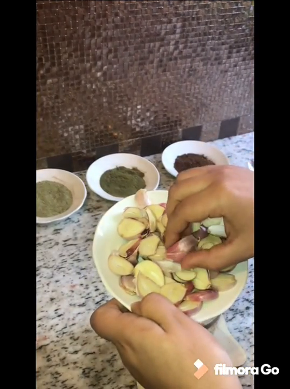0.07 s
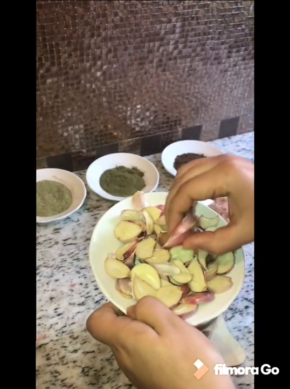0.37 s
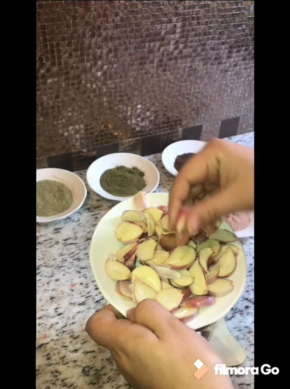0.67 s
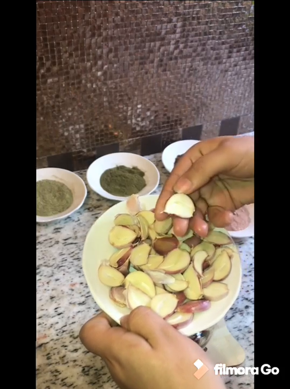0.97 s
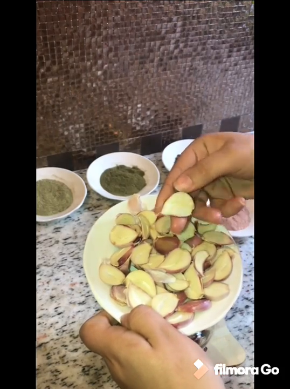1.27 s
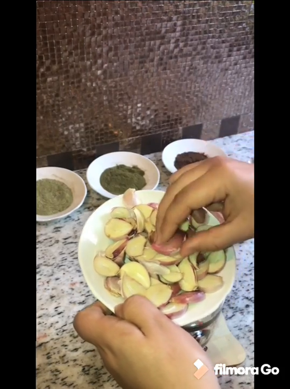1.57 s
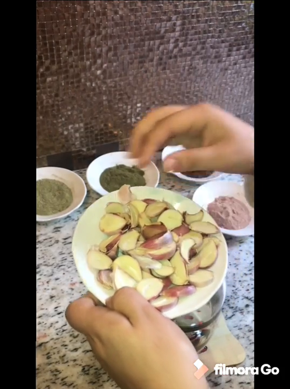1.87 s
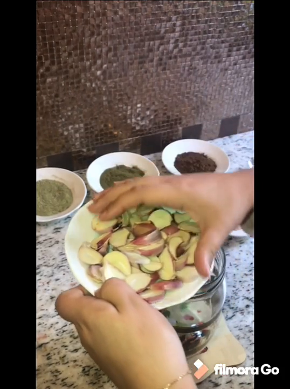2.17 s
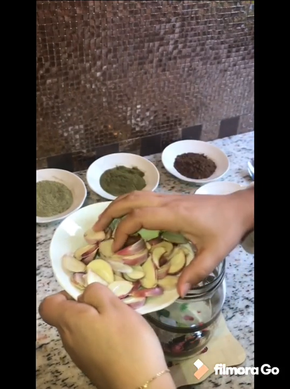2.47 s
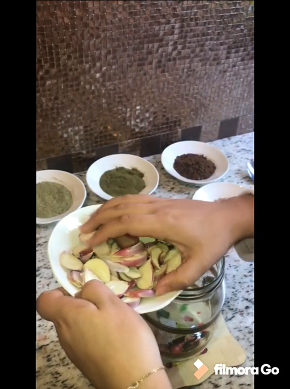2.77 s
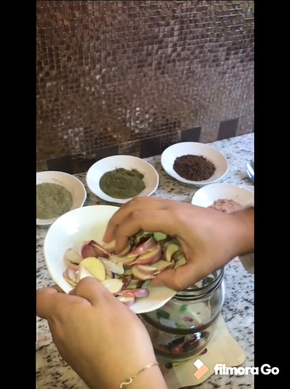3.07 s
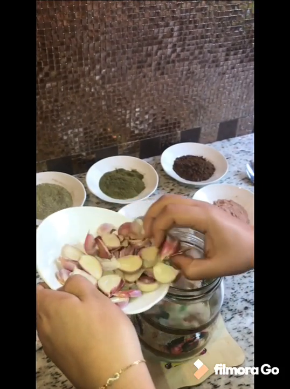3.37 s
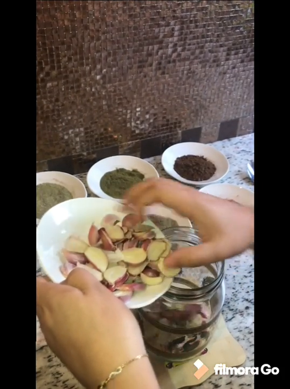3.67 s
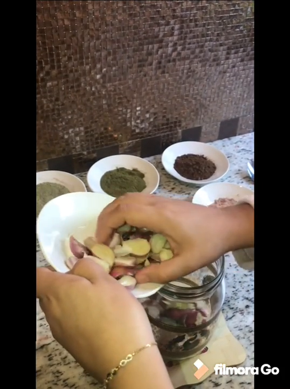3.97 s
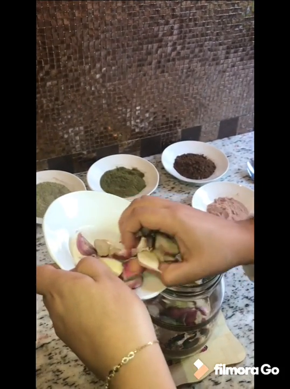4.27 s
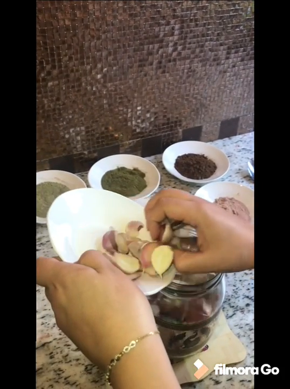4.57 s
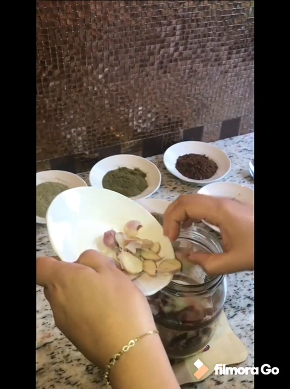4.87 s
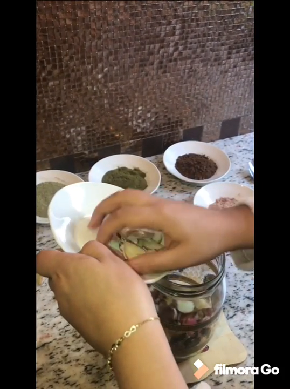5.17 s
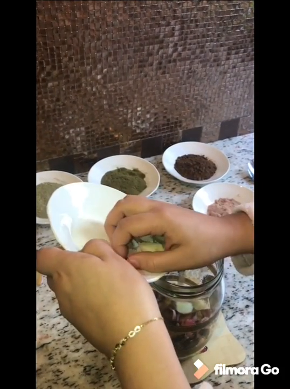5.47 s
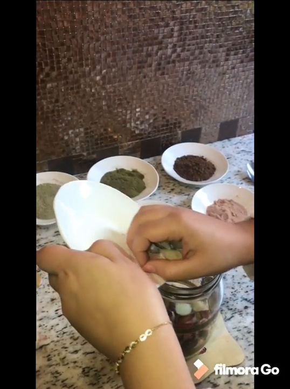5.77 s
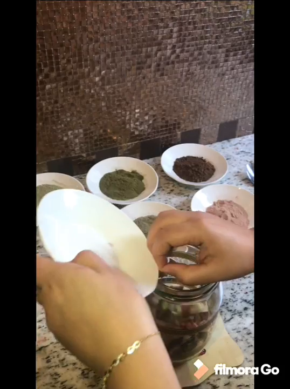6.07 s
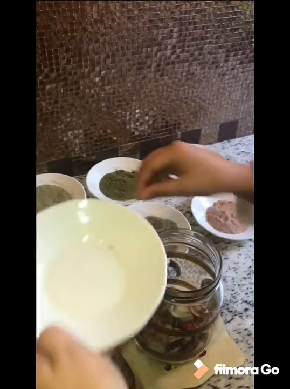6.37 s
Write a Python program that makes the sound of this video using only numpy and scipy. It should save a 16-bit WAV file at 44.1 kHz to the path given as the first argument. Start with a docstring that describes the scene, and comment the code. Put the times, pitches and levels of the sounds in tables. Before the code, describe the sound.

In a quiet kitchen, a close microphone picks up fingers stirring sliced garlic with crisp, papery crackles. A china dish clinks sharply on a glass jar, and the pieces scrape off and tumble in by handfuls, with moist patters, soft thuds and light taps on the glass. A second clink and a last few pieces follow, over a faint room hum.

```python
"""A kitchen with a stone counter, one microphone within arm's reach of a glass jar.
Sliced garlic is swept into the jar by hand from a china dish. Dry skins rustle and snap, handfuls
patter in and wake the jar's hollow note, and a few pieces land with a dull thud. The dish knocks on
the jar's mouth and rings, then clinks on it again when empty. Counter and tiles throw back quick
reflections; behind it all the room rumbles and a faint hum wavers far off."""
import sys
import numpy as np
from scipy import signal
from scipy.fft import rfft, irfft
from scipy.io import wavfile
from scipy.ndimage import uniform_filter1d

SR = 44100
rng = np.random.default_rng(int(sys.argv[2]) if len(sys.argv) > 2 else 0)


def to_wav(s):
    """Save 16-bit WAV."""
    ch = np.atleast_2d(s).T  # columns
    pcm = np.round(np.clip(ch, -1, 1) * 32767)  # PCM
    wavfile.write(sys.argv[1], SR, pcm.astype(np.int16))


N = 291501
TIME = np.arange(N) / SR
CUTOFF_HZ = 15800
DISH_PAIR_HZ = (1733.6, 1749.0)   # the dish's lowest modes, close enough to beat
# modes of the glass jar, the note of its air first: (frequency [Hz], level [dB], t60 [s])
JAR_MODES = [(351, -20, .17), (1270, -24, .1), (1980, -18, .17), (2277, -22, .15), (3327, -18, .13),
             (3702, -7, .075), (4078, -18, .17), (5038, -2, .065), (5170, -19, .1), (5995, -19, .12),
             (7057, -9, .055), (7290, -22, .1), (8550, -29, .15), (9280, -25, .1), (11780, -24, .08)]


def from_db(db):
    """Decibels to gain."""
    return 10 ** (np.asarray(db) / 20)


def rms_one(x):
    """Scale to unit rms."""
    return x / np.sqrt(np.mean(x ** 2) + 1e-20)


def add(out, start_s, sound):
    """Mix a sound in at a time."""
    at = round(start_s * SR)
    out[at:at + len(sound)] += sound[:N - at]


def cut(x, hz, kind, order=2):
    """Butterworth filter."""
    sections = signal.butter(order, np.clip(hz, 10, .45 * SR), kind, fs=SR, output="sos")
    return signal.sosfilt(sections, x + 1e-18)


def coloured(x, colour, size=4096):
    """Minimum-phase filter of unit power gain that follows (frequency [Hz], level [dB]) points."""
    hz, db = np.transpose(colour)
    grid_hz = np.maximum(np.fft.rfftfreq(size, 1 / SR), 1)
    gain = from_db(np.interp(np.log(grid_hz), np.log(hz), db))
    cepstrum = irfft(np.log(gain))[:size // 2]
    cepstrum[1:] *= 2
    response = irfft(np.exp(rfft(cepstrum, size)))
    return signal.fftconvolve(x, response / np.linalg.norm(response))[:len(x)]


def drift(per_s):
    """Random wander: straight lines between values of spread 1."""
    knots = rng.standard_normal(N // 20)
    return np.interp(TIME * per_s, np.arange(len(knots)), knots)


def ringing(modes):
    """A body's answer to one click; neighbouring modes swing in opposite senses."""
    t = TIME[:SR]
    return sum((-1) ** k * from_db(db - 60 * t / t60) * np.sin(2 * np.pi * hz * t)
               for k, (hz, db, t60) in enumerate(modes))


def bursts(onsets, t60):
    """Envelope that jumps at each (time [s], level [dB]) and dies away."""
    out = np.zeros(N)
    for s, db in onsets:
        add(out, s, from_db(db - 60 * TIME[:SR // 2] / t60))
    return out


def noise_burst(delay_s, db, t60):
    """One second holding a single dying puff of white noise."""
    return rng.standard_normal(SR) * bursts([(delay_s, db)], t60)[:SR]


def gestures(moves, attack_s, build_db):
    """Envelope of movements: each fades in, changes by build_db over its length and dies away."""
    out, t = np.zeros(N), TIME[:SR]
    for s, length, db, fall_db_per_s in moves:
        shape_db = build_db * np.minimum(t / length - 1, 0) - fall_db_per_s * np.maximum(t - length, 0)
        add(out, s, np.minimum(t / attack_s, 1) * from_db(db + shape_db))
    return out


def grains(per_s, spread_db):
    """Tiny contacts at random moments; the spread makes a few stand out; rms 1."""
    sizes = from_db(spread_db * np.minimum(rng.exponential(1, N), 4))
    signs = rng.choice([-1, 1], N)
    return rms_one(sizes * signs * (rng.random(N) < per_s / SR))


def crackle(per_s, spread_db, clump_db, bands=10):
    """Grains dealt out to pitch bands, each band coming in its own clumps; rms 1."""
    clicks = grains(per_s, spread_db)
    edges_hz = np.linspace(np.sqrt(300), np.sqrt(CUTOFF_HZ), bands + 1) ** 2
    band_of_click = rng.integers(0, bands, N)
    out = np.zeros(N)
    for k in range(bands):
        clumps = from_db(clump_db * drift(per_s=90))
        out += cut(clicks * (band_of_click == k) * clumps, edges_hz[k:k + 2], "band", order=1)
    return rms_one(out)


def dish_knocks():
    """Each blow clacks and rings dish, jar and counter; a softer contact leaves the high modes out."""
    # dish against jar: (time [s], level [dB], contact brightness [Hz], dish [dB], jar [dB],
    # counter [dB], crack [dB])
    blows = [(2.7422, -15, 7360, -2.5, -17, 11.5, -9.5), (2.8936, -27, 1210, -18.5, 7, 11, -6),
             (5.9989, -15, 8900, -28.5, 0, -7.5, -5), (6.0073, -22, 7000, -20, -18, -11.5, -4.5)]
    # modes of the china dish: (frequency [Hz], level [dB], t60 [s])
    dish_modes = [(2262, -16, .15), (2450, -21, .09), (2720, -19, .09), (3478, -15, .19), (3715, -10, .075),
                  (4108, -19, .23), (4784, -25, .25), (5438, -24, .19), (5955, -5, .04), (6010, -17, .16),
                  (8600, -21, .1)]
    # modes of the jar's foot on the counter: (frequency [Hz], level [dB], t60 [s])
    counter_modes = [(351, -30, .17), (636, -31, .08), (910, -35, .11), (1136, -27, .1), (1384, -24, .09),
                     (1613, -23, .09), (1919, -28, .1)]
    dish, jar = ringing(dish_modes), ringing(JAR_MODES)
    clack = cut(ringing([(1450, 6, 0.0061)]), 700, "high", order=1)
    counter = ringing(counter_modes) + clack
    out = np.zeros(N)
    for s, db, contact_hz, dish_db, jar_db, counter_db, crack_db in blows:
        crack = cut(noise_burst(delay_s=0.0045, db=crack_db, t60=0.022), 990, "high")
        # many weak, close modes blur into a short clatter
        clatter = cut(noise_burst(delay_s=0, db=-8, t60=0.11), [1600, 3600], "band")
        bodies = from_db(dish_db) * dish + from_db(jar_db) * jar + from_db(counter_db) * counter
        add(out, s, from_db(db) * cut(bodies + crack + clatter, contact_hz, "low"))
    return cut(out, 210, "high")   # the knocks carry little bass


def dish_chimes(t60=.56):
    """The hand-held dish sings on after a touch, throbbing as its two lowest modes beat."""
    # touches on the rim, whose place starts the modes together or opposed:
    # (time [s], level [dB], sense [+1 or -1])
    touches = [(2.7422, -29, -1), (2.89395, -38, 1), (3.46, -49, -1), (4.275, -56, -1), (4.66, -55, -1),
               (5.9, -62, 1), (5.9991, -52, -1), (6.137, -50, -1)]
    lower, upper = (ringing([(hz, 0, t60)]) for hz in DISH_PAIR_HZ)
    out = np.zeros(N)
    for s, db, sense in touches:
        add(out, s, from_db(db) * (lower + sense * upper))
    return out


def garlic_drops(splat_gain_db=-4, hollow_gain_db=2, glass_db=-33):
    """Moist pieces land in a spray of contacts that rings the glass; each puffs the air in the jar."""
    # pieces landing in the jar: (time [s], splat [dB], hollow note [dB])
    landings = [(3.233, -31.5, -45.5), (3.3884, -25.5, -39), (3.4395, -50, -45.5), (3.4703, -31, -37),
                (3.5045, -31.5, -52), (3.5664, -36.5, -41.5), (3.5987, -44, -55), (3.6268, -38.5, -44.5),
                (3.699, -31, -36.5), (3.7307, -38, -40), (4.4787, -34, -48.5), (4.4944, -36.5, -47),
                (4.635, -33.5, -50), (4.6931, -35.5, -49.5), (4.774, -40.5, -53), (4.8632, -37, -52.5),
                (4.9015, -37, -48), (4.9392, -39.5, -81), (4.9901, -40, -79), (5.047, -38.5, -55.5),
                (5.0686, -39, -53.5), (6.0684, -34.5, -49.5), (6.109, -36, -50)]
    # spectrum of a moist splat: (frequency [Hz], level [dB])
    splat_colour = [(200, 11.5), (700, -14), (1400, 8.5), (3200, 4), (5000, 6), (8000, 5), (12000, 5),
                    (15500, 3.5)]
    splats = bursts([(s, db + splat_gain_db) for s, db, _ in landings], t60=0.068)
    spray = crackle(per_s=12000, spread_db=2.5, clump_db=2) * splats
    glass = signal.fftconvolve(spray, ringing(JAR_MODES[1:]))[:N]
    out = coloured(spray, splat_colour) + from_db(glass_db) * glass
    air_hz, _, air_t60 = JAR_MODES[0]
    for s, _, hollow_db in landings:
        add(out, s, ringing([(air_hz, hollow_db + hollow_gain_db, air_t60)]))
    return out


def garlic_patter(heap_db=2, jar_db=-16, dish_db=-33, dish_t60=.25):
    """Tumbling pieces drum softly on the heap and brush the jar and the dish's edge."""
    # handfuls tumbling in: (start [s], length [s], end level [dB], settling [dB/s])
    handfuls = [(3.22, .12, -64.5, 101), (3.38, 0.25, -55, 88), (4.47, .05, -68, 100),
                (4.62, 0.12, -61.5, 63), (4.88, 0.16, -67, 98), (5.085, 0.014, -54.5, 280),
                (6.03, 0.077, -59, 83)]
    # spectrum of the drumming on the heap: (frequency [Hz], level [dB])
    heap_colour = [(45, -19.5), (80, 28.5), (115, 24.5), (180, -9.5), (280, 21.5), (600, 7), (1300, 12),
                   (2500, -26), (6000, -7.5)]
    flow = gestures(handfuls, attack_s=0.013, build_db=-6)   # a handful comes at once and thins out
    touches = grains(per_s=1100, spread_db=0) * flow
    damped_dish = ringing([(hz, 0, dish_t60) for hz in DISH_PAIR_HZ])
    bodies = from_db(jar_db) * ringing(JAR_MODES[:4]) + from_db(dish_db) * damped_dish
    return from_db(heap_db) * coloured(touches, heap_colour) + signal.fftconvolve(touches, bodies)[:N]


def garlic_thuds(gain_db=2, band_ratio=1.56):
    """A firm piece lands and rocks: a dull, broad knock."""
    # heavy landings on something firm: (time [s], level [dB], pitch [Hz], t60 [s])
    landings = [(1.681, -64, 1690, 0.034), (3.8243, -42, 708, 0.032), (3.826, -46.5, 2200, 0.0092),
                (4.036, -41.5, 2080, 0.031), (4.046, -50, 890, 0.07), (4.153, -57.5, 1160, 0.095),
                (4.248, -57.5, 990, 0.048), (4.905, -52.5, 1040, .15), (5.093, -40, 1510, 0.035),
                (5.634, -49.5, 2200, 0.035), (5.6597, -37, 2070, 0.043), (5.6621, -32, 366, 0.096),
                (5.667, -39.5, 870, 0.15)]
    out, size = np.zeros(N), SR // 4
    for s, db, hz, t60 in landings:
        tone = cut(rng.standard_normal(size), [hz / band_ratio, hz * band_ratio], "band", order=3)
        tone /= np.sqrt(uniform_filter1d(tone ** 2, size=500) + 1e-12)   # only the blow sets the level
        add(out, s, tone * bursts([(0.0014, db + gain_db)], t60)[:size])
    return out


def dry_skins(snap_gain_db=3):
    """Papery skins rustle in clumps of crisp ticks under the fingers, and now and then one snaps."""
    # finger strokes through the pieces: (start [s], length [s], end level [dB], settling [dB/s])
    strokes = [(0.0, 0.24, -60.5, 220), (.457, 0.03, -57.5, 499), (.54, 0.012, -55.5, 192),
               (1.68, 0.059, -64.5, 200), (2.27, 0.084, -68, 100), (2.38, 0.078, -57, 122),
               (2.52, 0.076, -61, 102), (2.68, 0.087, -52.5, 190), (2.83, 0.17, -51.5, 210),
               (3.1, 0.14, -50, 47), (3.36, 0.24, -44.5, 200), (3.68, 0.031, -46, 167.5),
               (3.85, .23, -55, 79.5), (4.2, 0.073, -54, 50), (4.46, .06, -49, 128),
               (4.62, 0.17, -50.5, 246), (4.89, .19, -52.5, 95), (5.34, 0.07, -59.5, 100.5),
               (5.51, 0.16, -58, 120), (5.85, 0.11, -58, 101), (6.04, 0.052, -48, 123)]
    # skins snapping: (time [s], level [dB])
    breaks = [(0.099, -40.5), (0.1315, -43), (0.1345, -40.5), (0.1897, -39), (0.2407, -36.5), (0.4656, -47),
              (0.473, -41.5), (0.543, -47), (1.005, -59.5), (1.1149, -58), (2.122, -60), (2.3707, -45),
              (2.4073, -40), (2.4529, -37), (2.7041, -37.5), (2.848, -47), (3.3754, -40), (3.8244, -39.5),
              (4.0107, -34.5), (4.036, -35), (4.134, -45), (4.223, -43.5), (5.4216, -44), (5.5278, -47.5),
              (5.66, -40), (6.238, -52.5), (6.29, -56.5)]
    # spectrum of dry skin: (frequency [Hz], level [dB])
    skin_colour = [(300, -14), (900, -11.5), (1600, -6.5), (3300, 3.5), (5000, 0.5), (7500, 1.5),
                   (11000, -1), (15500, 2.5)]
    effort = gestures(strokes, attack_s=.015, build_db=6.5)   # the heap bunches up before the fingers
    rustle = crackle(per_s=9000, spread_db=3.3, clump_db=4) * effort
    snap_envelope = bursts([(s + 0.00059, db + snap_gain_db) for s, db in breaks], t60=0.013)
    snaps = rng.standard_normal(N) * snap_envelope
    return coloured(rustle + snaps, skin_colour)


def nail_ticks(gain_db=4):
    """A fingernail ticks on the china dish and wakes a few of its high modes."""
    # nail ticks on the dish: (time [s], level [dB])
    taps = [(3.286, -37.5), (5.2832, -48.5), (5.345, -55), (5.564, -58.5)]
    # high modes of the dish under a nail: (frequency [Hz], level [dB], t60 [s])
    tick_modes = [(3643, 3, 0.041), (3600, -27, 0.17), (5990, -9.5, 0.044)]
    out, tink = np.zeros(N), ringing(tick_modes)
    for s, db in taps:
        add(out, s, from_db(db + gain_db) * tink)
    return out


def rubbing():
    """Pieces rub along china and glass: a wide band rasps, a narrow one squeaks."""
    # rubs: (start [s], length [s], level [dB], pitch [Hz], half bandwidth [Hz])
    rubs = [(0.189, 0.048, -60.5, 1850, 696), (0.55, 0.053, -62.5, 3600, 696),
            (1.72, 0.043, -64.5, 3430, 695), (3.383, 0.071, -37, 4012, 30.4), (3.444, 0.22, -50, 4024, 90),
            (3.946, 0.42, -76, 3450, 700), (5.335, 0.29, -67.5, 3720, 130)]
    out = np.zeros(N)
    for s, length, db, hz, half_width_hz in rubs:
        size = int(length * SR)
        tone = cut(rng.standard_normal(SR), [hz - half_width_hz, hz + half_width_hz], "band")[-size:]
        add(out, s, from_db(db) * rms_one(tone) * signal.windows.tukey(size, .3))
    return out


def kitchen_echoes(direct, near_db=-7, near_t60=0.029, far_db=-8, far_t60=0.21, wall_hz=6000):
    """The direct sound, quick reflections from counter and tiles, then the tail of the room."""
    out = direct
    for db, t60 in ((near_db, near_t60), (far_db, far_t60)):
        echoes = cut(noise_burst(delay_s=.002, db=0, t60=t60), wall_hz, "low", order=1)
        reflected = signal.fftconvolve(direct, echoes / np.linalg.norm(echoes))[:N]
        out = out + from_db(db) * reflected / 2
    return out


def room_tone(hum_hz=184, mains_hz=150.5, mains_db=-71, waver_db=3):
    """Low room rumble, a mains drone and a faint hum wavering far off."""
    # spectrum of the rumble: (frequency [Hz], level [dB])
    rumble_colour = [(15, -29.5), (25, -8.5), (43, 0), (76, -2), (149, -7.5), (317, -15.5), (363, -10),
                     (463, -22.5), (545, -13.5), (624, -18), (1020, -25.5), (1100, -23.5), (4740, -35.5),
                     (12900, -38.5), (16000, -46)]
    # slow swell of the rumble: (time [s], level [dB])
    rumble_levels = [(0.0, -61.5), (2.6, -59.5), (5.0, -58.5), (6.6, -59.5)]
    # harmonics of the far hum: (multiple of its pitch, level [dB])
    harmonics = [(2, -88), (3, -81), (4, -82.5)]
    swell = from_db(np.interp(TIME, *np.transpose(rumble_levels)))
    rumble = coloured(rng.standard_normal(N), rumble_colour) * swell
    pitch_hz = hum_hz * (1 + .02 * drift(per_s=1) + .008 * drift(per_s=28))
    phase = 2 * np.pi * np.cumsum(pitch_hz) / SR
    hum = sum(from_db(db + waver_db * drift(per_s=0.43)) * np.sin(k * phase) for k, db in harmonics)
    mains = from_db(mains_db + waver_db * drift(per_s=1.3)) * np.sin(2 * np.pi * mains_hz * TIME)
    return rumble + np.sqrt(2) * (hum + mains)


def scene():
    """Dish, garlic and jar within arm's reach of one microphone, the room behind them."""
    handling = dish_knocks() + garlic_drops() + garlic_patter() + garlic_thuds()
    handling += dry_skins() + nail_ticks() + rubbing()
    return (kitchen_echoes(handling) + dish_chimes() + room_tone())[None]


def record(dry):
    """A low cut on the microphone takes out the deepest bass, and a steep filter the very top."""
    top_cut = signal.ellip(10, .2, 70, CUTOFF_HZ, fs=SR, output="sos")
    return signal.sosfilt(top_cut, cut(dry, 34, "high", order=6))


dry = scene()
out = record(dry)
to_wav(out)
```